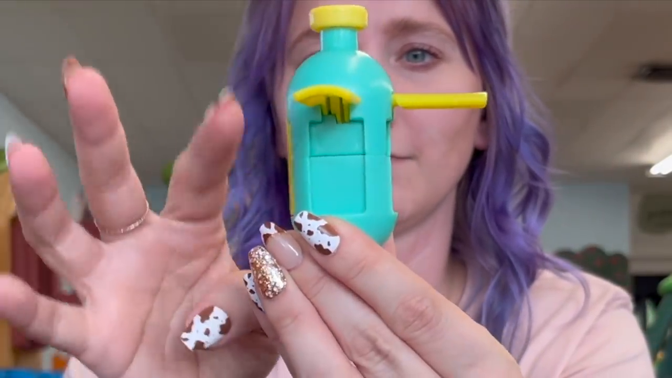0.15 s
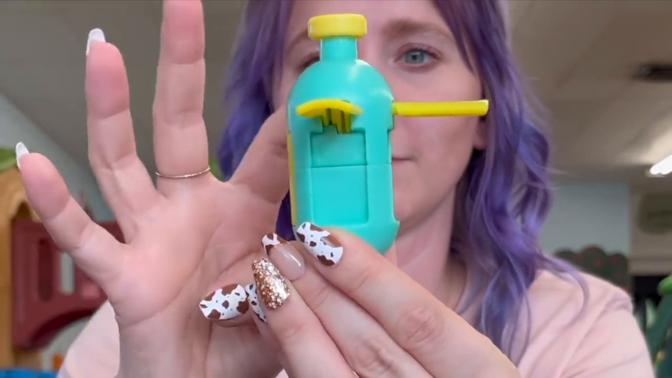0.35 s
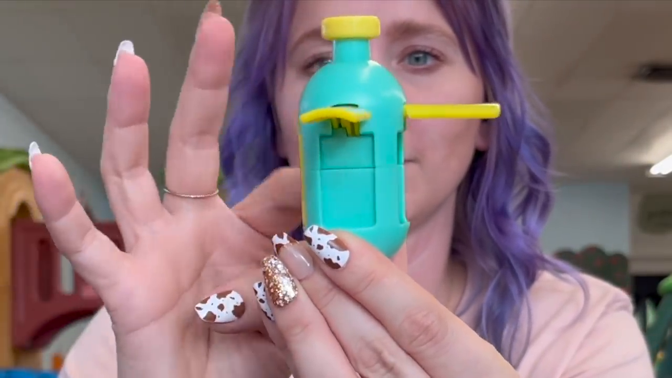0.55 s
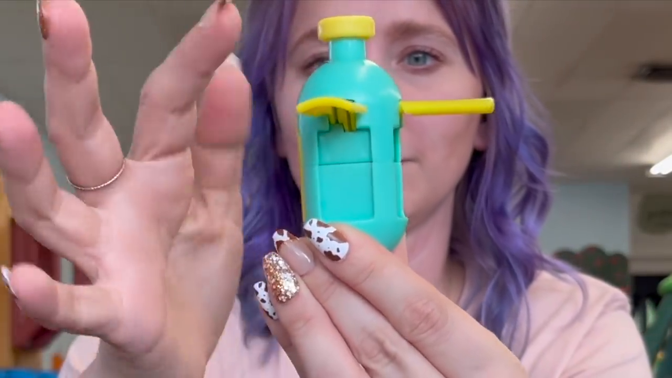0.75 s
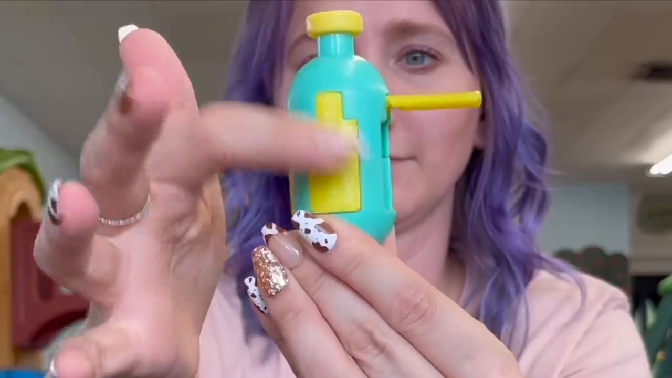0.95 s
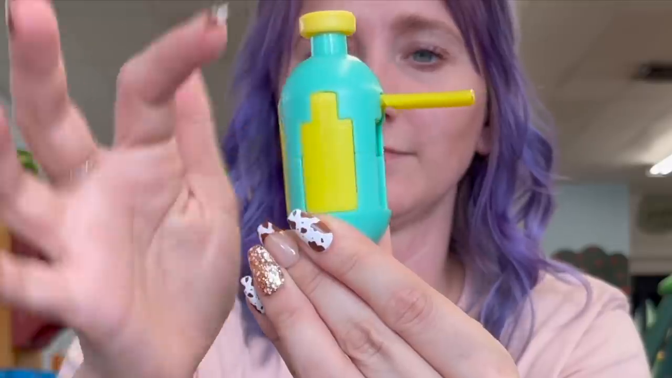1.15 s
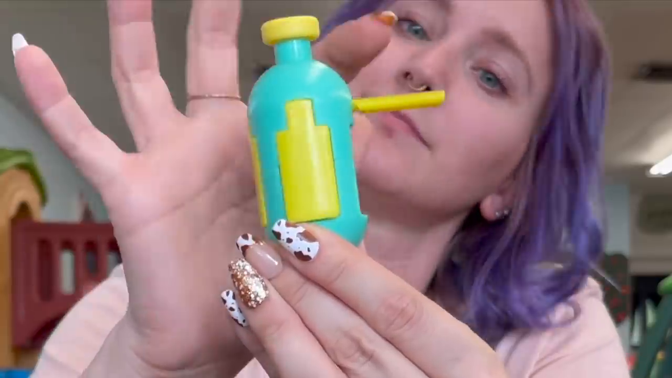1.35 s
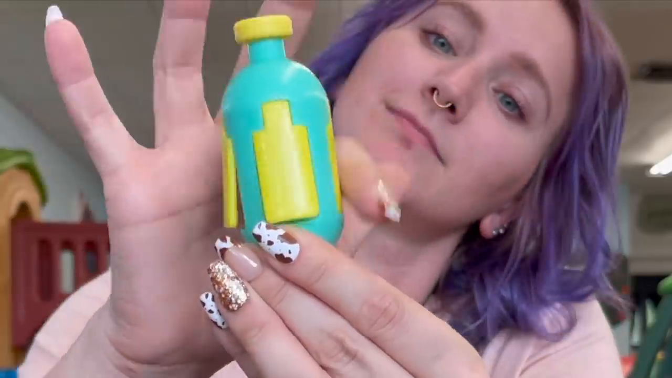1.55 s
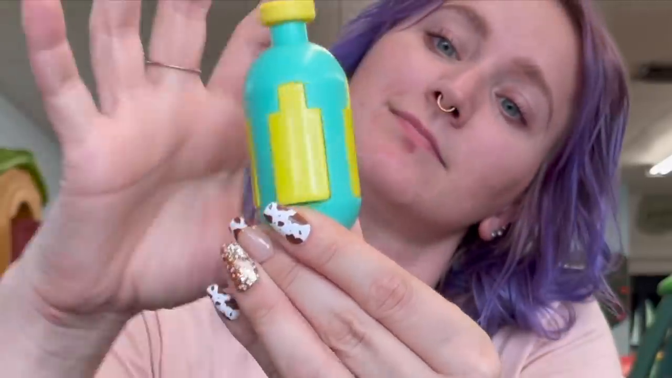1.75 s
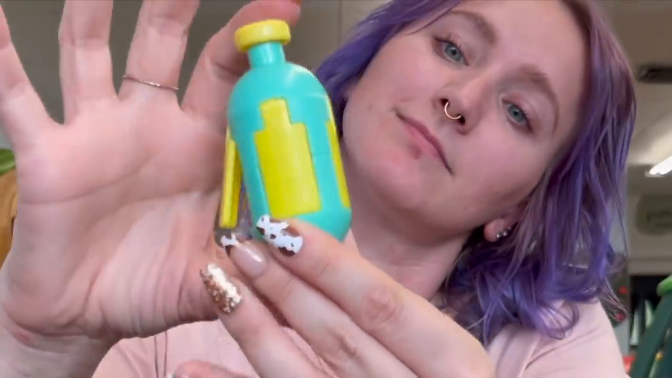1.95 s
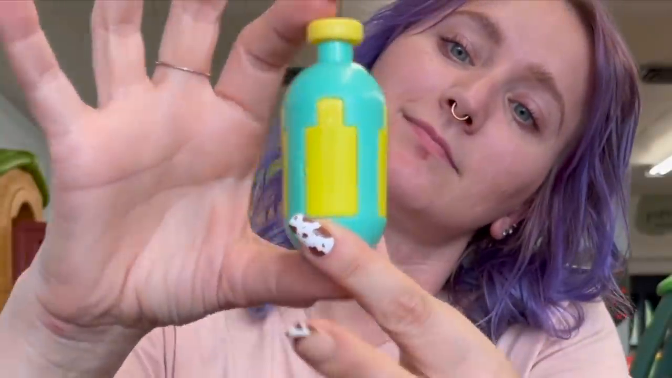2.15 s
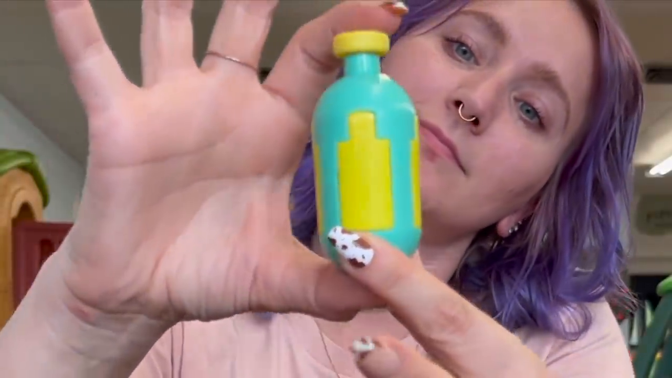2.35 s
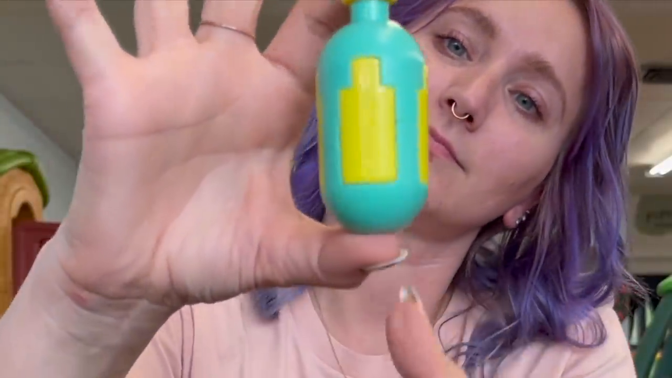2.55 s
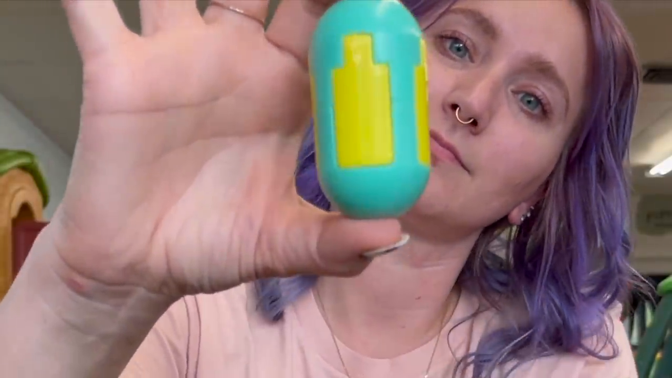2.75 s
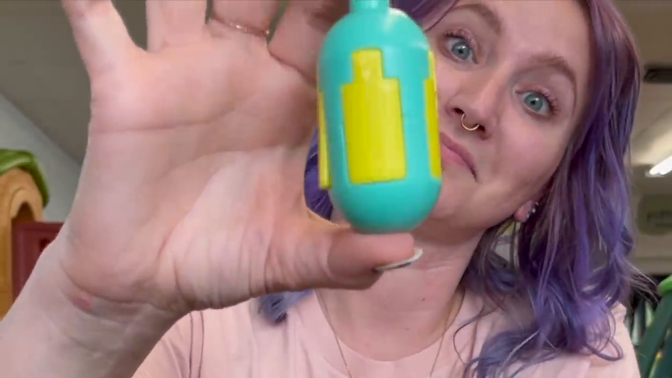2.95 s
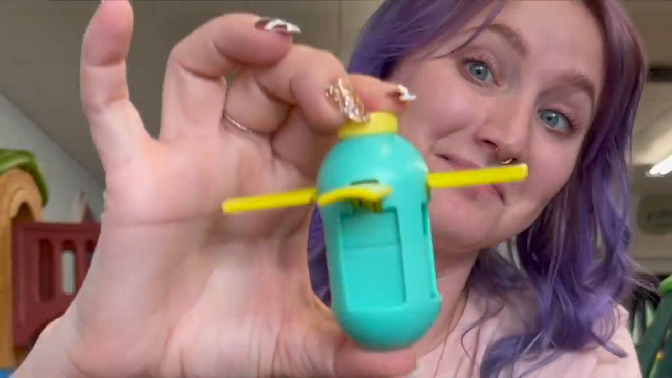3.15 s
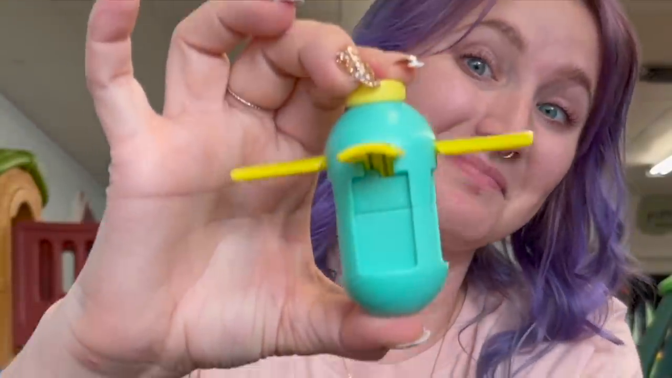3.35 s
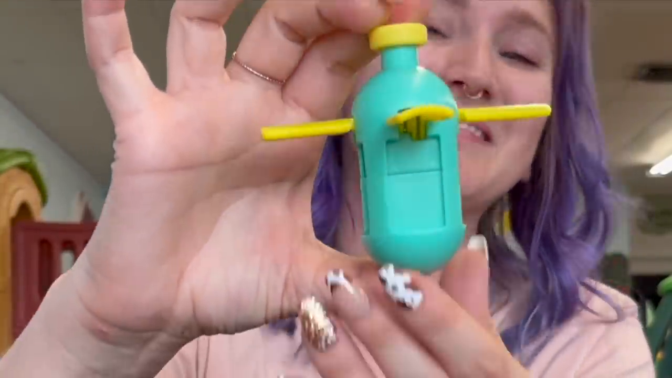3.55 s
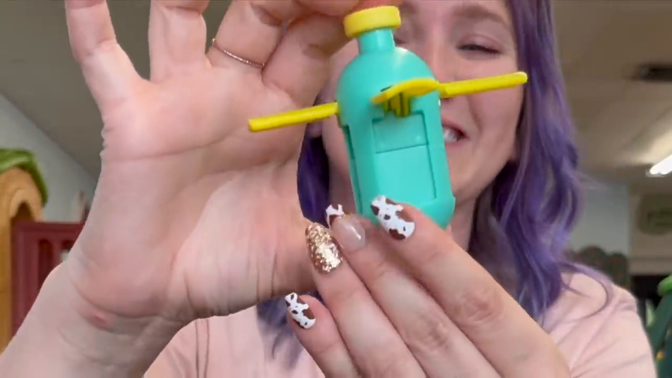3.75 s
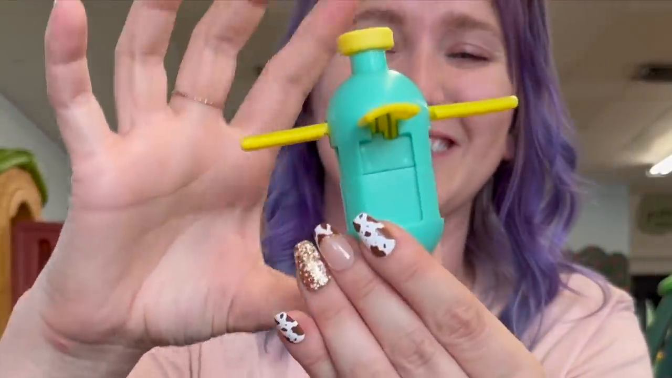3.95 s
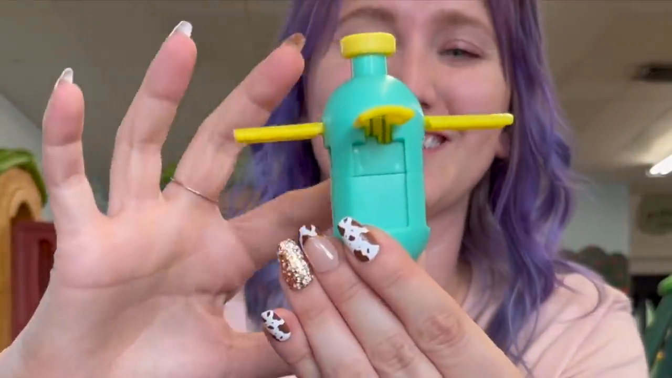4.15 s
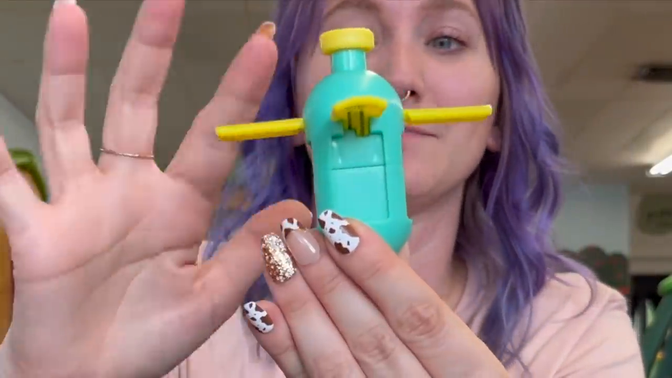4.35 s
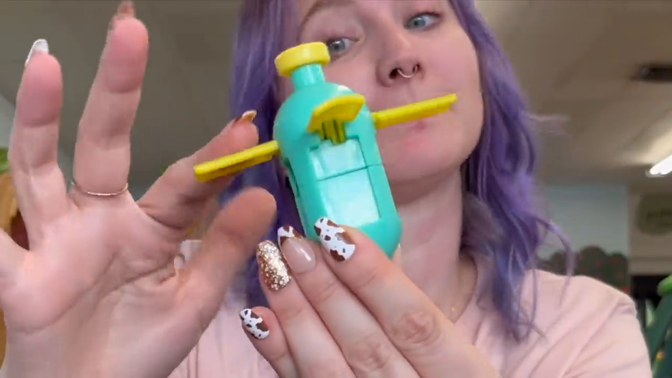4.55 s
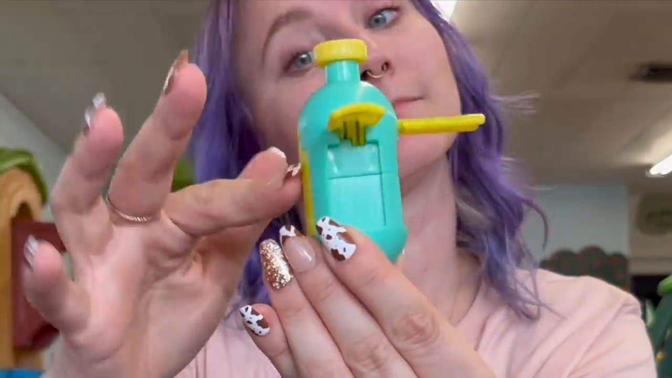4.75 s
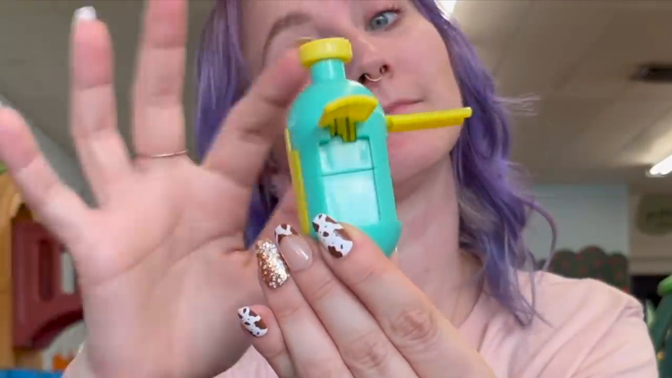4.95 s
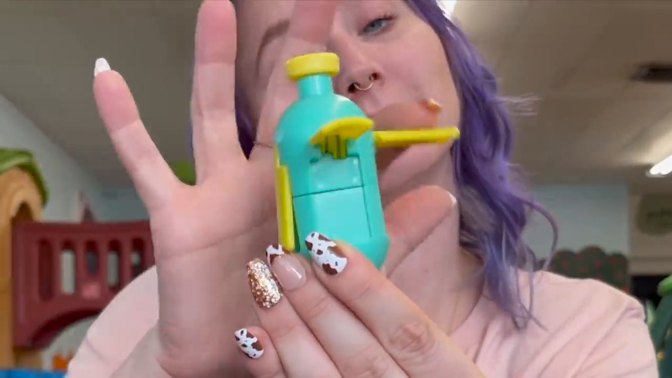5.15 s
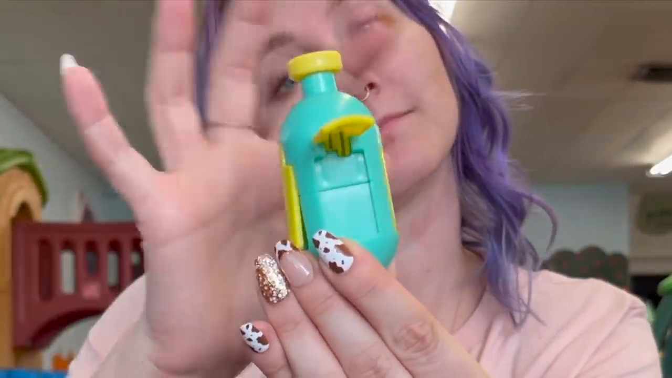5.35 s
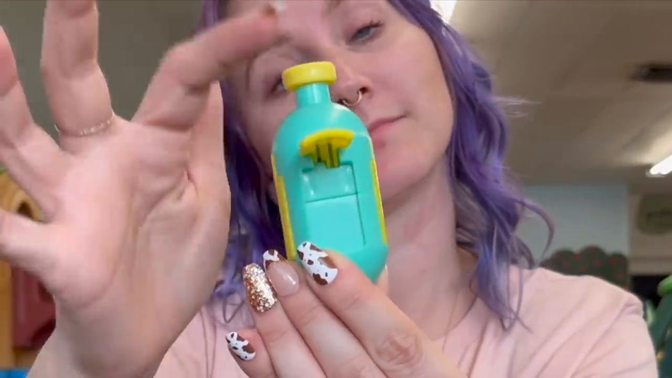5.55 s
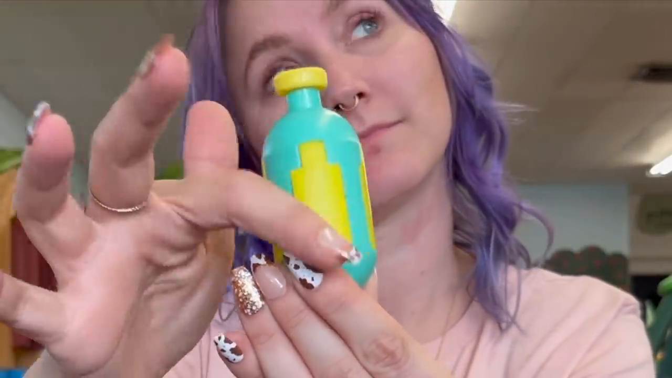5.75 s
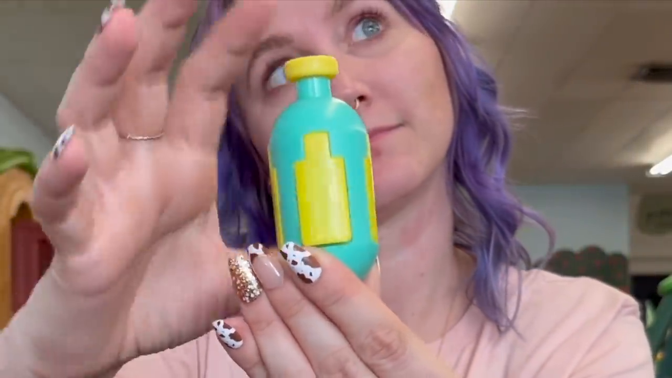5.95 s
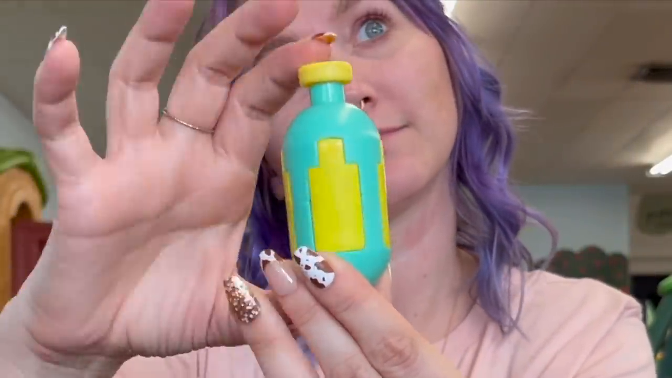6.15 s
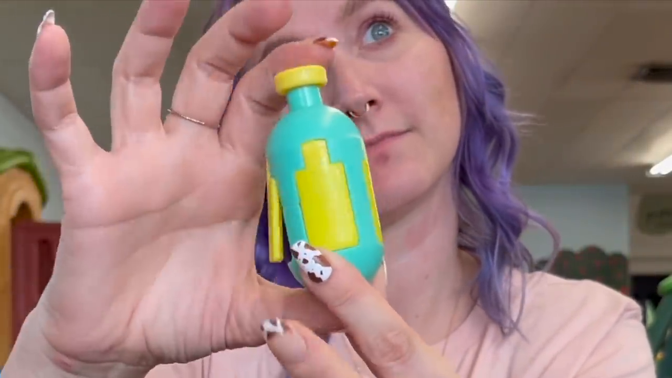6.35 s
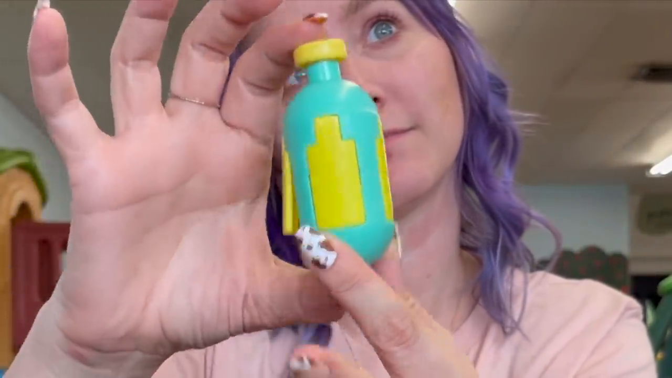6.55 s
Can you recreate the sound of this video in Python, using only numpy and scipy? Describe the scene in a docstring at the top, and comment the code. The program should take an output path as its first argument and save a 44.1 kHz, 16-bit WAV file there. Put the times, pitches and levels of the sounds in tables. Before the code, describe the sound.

A small hollow plastic fidget toy is worked by hand close to the microphone. Its sprung flaps flick open and latch shut with sharp, bright snaps at an uneven pace, a quick cluster coming about halfway through. Between the snaps, fingernails tick on the shell and fingers rub and bump it softly. The room adds a short echo, and ventilation rumbles and hums faintly behind.

```python
"""In a fairly live room, a small hollow plastic fidget toy is worked by hand close to the microphone.
Its sprung flaps fly open and latch shut: each impact sets the shell vibrating with a sharp snap.
Between snaps fingernails tick, fingers slide by stick-slip friction and soft fingertips knock dully.
The room reverberates, and ventilation rumbles and hums faintly behind."""
import sys
import numpy as np
from scipy import signal
from scipy.fft import rfft, irfft
from scipy.io import wavfile

SR = 44100
rng = np.random.default_rng(int(sys.argv[2]) if len(sys.argv) > 2 else 0)


def master(y):
    """Save y as 16-bit WAV."""
    cut = np.clip(np.atleast_2d(y).T, -1, 1)
    pcm = np.round(cut * 32767)  # scale
    wavfile.write(sys.argv[1], SR, pcm.astype(np.int16))


N = 291501


def from_db(db):
    """Amplitude ratio of a level in decibels."""
    return 10 ** (np.asarray(db) / 20)


def unit_rms(x):
    """Normalisation to rms 1."""
    return x / np.sqrt(np.mean(x ** 2) + 1e-30)


def unit_energy(x):
    """Normalisation of each row to energy 1."""
    return x / np.sqrt(np.sum(x ** 2, axis=-1, keepdims=True) + 1e-30)


def at_hz(curve, hz):
    """Interpolation of (frequency, value) pairs on a log-frequency axis."""
    knots_hz, values = np.transpose(curve)
    return np.interp(np.log(hz + 1e-9), np.log(knots_hz), values)


def add(track, onset_s, sound):
    """Superposition: a sound adds to the track from its onset."""
    start = int(np.clip(round(onset_s * SR), 0, N))
    track[start:start + len(sound)] += sound[:N - start]


# left-right coherence of the diffuse field: f/Hz, coherence (0-1)
COHERENCE = [(70, 0.96), (130, 1), (300, 0.5), (1200, 0.2), (2500, 1), (6500, 0), (8000, 1), (15000, .95)]

def diffuse_field(size):
    """Partial coherence: noise from all sides is only partly alike left and right. Gives f and spectra."""
    hz = np.fft.rfftfreq(size, 1 / SR)
    alike = np.clip(at_hz(COHERENCE, hz), 0, 1)
    mid, side = rfft(rng.standard_normal((2, size)))
    return hz, np.sqrt((1 + alike) / 2) * mid + np.sqrt((1 - alike) / 2) * side * [[1], [-1]]


# spectrum of moving air: f/Hz, relative spectral level/dB
AIR_SPECTRUM = [(20, -21.5), (35, -23), (47, -0.5), (58, 4), (78, -1.5), (100, -7.5), (135, -12),
                (165, -19), (260, -25), (500, -32.5), (1000, -38.5), (2500, -54.5), (9500, -56),
                (16000, -72)]

def ventilation(air_db=-53.5, hum_hz=120.4, hum_db=-62.5, waver=0.075):
    """Broadband noise plus a tone: air rumbles under an unsteady hum at twice the mains frequency."""
    hz, noise = diffuse_field(N)
    air = unit_rms(irfft(noise * from_db(at_hz(AIR_SPECTRUM, hz)), N))
    drift = unit_rms(irfft(rfft(rng.standard_normal(N)) * np.exp(-hz / 2.2), N))
    hum = np.sqrt(2) * np.sin(2 * np.pi * hum_hz * np.arange(N) / SR) * (1 + waver * drift)
    return from_db(air_db) * air + from_db(hum_db) * hum


def minimum_phase(magnitude):
    """Causality: the spectrum of this magnitude that rings only after it is struck."""
    cepstrum = irfft(np.log(magnitude + 1e-12))
    half = cepstrum.shape[-1] // 2
    fold = np.r_[1, np.full(half - 1, 2), 1, np.zeros(half - 1)]
    return np.exp(rfft(cepstrum * fold))


# resonances colouring every click, including a bright 10 kHz peak, probably the microphone's:
# f/Hz, width/Hz, relative level/dB
CLICK_RESONANCES = [(421.4, 250, -24.5), (877, 210, -17), (1398, 560, -8.5), (1744, 390, -8),
                    (2130, 100, -8.5), (3700, 590, -13.5), (4676, 1700, -3.5), (5930, 610, -5.5),
                    (6430, 330, -11.5), (8250, 1800, -4.5), (9460, 640, -7), (10110, 920, 6),
                    (10930, 280, -7), (12200, 540, -11.5), (14810, 1200, -25)]
# borders between a click's three registers (hollow low part, crack, bright edge): f/Hz
REGISTER_BORDERS = [2600, 7500]

def contact_clicks(levels_db, rattle_ms, ripple, rise_ms, scatter_db, size=1024):
    """Source and filter: resonances colour a rattle of micro-impacts, one output row per contact.
    levels_db[register, contact] is rms over 6 ms."""
    ms = 1000 * np.arange(size) / SR
    hz = np.fft.rfftfreq(size, 1 / SR)
    force = (1 - np.exp(-(ms / rise_ms) ** 2)) * np.exp(-ms / rattle_ms[:, None])
    impacts = rfft(force * rng.standard_normal(force.shape))
    # the micro-impacts interfere and ripple the spectrum; ripple 0 evens it out
    evened = irfft(impacts / (np.abs(impacts) + 1e-12) ** (1 - ripple))
    rattle = rfft(evened * force ** 0.25)
    register_power = np.zeros((len(REGISTER_BORDERS) + 1,) + rattle.shape)
    for centre_hz, width_hz, level_db in CLICK_RESONANCES:
        # each contact lands elsewhere and favours other resonances
        strength = from_db(level_db + scatter_db * rng.standard_normal((len(force), 1)))
        detuning = (hz ** 2 - centre_hz ** 2) / (hz + 1) / width_hz
        register = np.searchsorted(REGISTER_BORDERS, centre_hz)
        register_power[register] += (strength / (1 + detuning ** 2 / 2)) ** 2
    energy = np.mean(register_power * np.abs(rattle) ** 2, axis=-1, keepdims=True)
    filter_power = np.sum(register_power / energy * from_db(levels_db)[:, :, None] ** 2, axis=0)
    return irfft(rattle * minimum_phase(np.sqrt(filter_power * 0.006 * SR)))


def ring(hz, t60, size=6000):
    """Damped free vibration: a sine that swells in about 1 ms, with the energy of 6 ms at rms 1."""
    t = np.arange(size) / SR
    swell = 1 - np.exp(-(t / 0.0007) ** 2)
    sine = np.sin(2 * np.pi * (hz * t + rng.random()))
    return unit_energy(sine * swell * from_db(-60 * t / t60)) * np.sqrt(0.006 * SR)


# flaps leaving and hitting their stops: t/s, relative crack level/dB, hollow level/dB re crack,
# edge level/dB re crack, rattle time/ms, main ring f/Hz, its level/dB re crack, second ring f/Hz
FLAP_IMPACTS = [(0.0114, -27, -8, 7.5, 0.51, 2140, -5, 5730),
                (0.0415, -31, -13.5, 7.5, 2.5, 2370, -22.5, 6950),
                (0.456, -30, -16.5, 9.5, 0.57, 2110, -23, 5400),
                (0.458, -33.5, -6.5, 5.5, 0.47, 2140, -8.5, 4570),
                (0.9479, -23.5, -7, 5.5, 1.5, 2094, -11.5, 5085),
                (0.973, -33, -16.5, 3, 0.65, 2173, -25, 5395),
                (1.4922, -19, -10, 5.5, 2.16, 1350, -10, 5633), (2.979, -41, -6, 6, 2.8, 1700, -10.5, 4200),
                (3.0025, -26, -14, 6, 2.8, 1250, -10, 3900), (3.0052, -23, -7, 8.5, 2.4, 2200, -19.5, 3074),
                (4.1285, -26.5, -9.5, 9.5, 1.83, 2185, -7, 4580),
                (4.2517, -42.5, -8.5, 8.5, 1, 2190, -3, 4400), (4.72, -24, -9, 8, 1.8, 2100, -10, 4620),
                (5.1963, -27.5, -6, 12, 1.45, 6660, 3.5, 5820),
                (5.3032, -46.5, -5, 13, 1.6, 1892, -16, 5380), (5.692, -60, -13, 19, 1.4, 1800, -21, 5270),
                (5.727, -30.5, -5.5, 0.5, 2.5, 1824, -8, 5580)]

def flap_snaps(ripple, main_t60=0.012, second_t60=0.0045, second_db=-6.5):
    """Impulse excitation: a flap slams home, the shell cracks, and flap and cavity ring briefly."""
    onsets, crack_db, hollow_db, edge_db, rattle_ms, main_hz, main_db, second_hz = (
        np.transpose(FLAP_IMPACTS))
    levels_db = np.array([crack_db + hollow_db, crack_db, crack_db + edge_db])
    cracks = contact_clicks(levels_db, rattle_ms, ripple, rise_ms=0.52, scatter_db=3.0)
    out = np.zeros(N)
    for k, crack in enumerate(cracks):
        add(out, onsets[k], crack)
        add(out, onsets[k], from_db(crack_db[k] + main_db[k]) * ring(main_hz[k], main_t60))
        add(out, onsets[k], from_db(crack_db[k] + second_db) * ring(second_hz[k], second_t60))
    return out


# bands of the reverberant tail, the top ones set to fade quickly: f/Hz, relative level/dB, T60/s
TAIL_BANDS = [(300, 3.5, 0.38), (690, -7, 0.47), (1410, -11.5, 0.82), (2180, -6, 0.39), (3100, -9.5, 0.6),
              (4600, -9, 0.55), (6460, -12.5, 0.52), (7950, -11.5, 0.41), (10400, -18, 0.39),
              (11945, -12.5, 0.22), (13500, -31, .09)]

def reverberation(source, early_db=-8.5, early_t60=0.1, build_s=0.0027, gap_s=0.002, top_hz=12800):
    """Multiple reflection: quick returns from hands and body, then a diffuse reverberant tail."""
    t = np.arange(SR) / SR
    hz, noise = diffuse_field(SR)
    noise = noise / np.sqrt(1 + (hz / top_hz) ** 20)   # low-pass filter
    early_noise = irfft(noise, SR)[:, ::-1]   # reversed, so uncorrelated with the tail
    response = from_db(early_db) * unit_energy(early_noise * (t > gap_s) * from_db(-60 * t / early_t60))
    build_up = 1 - np.exp(-np.maximum(t - gap_s, 0) / build_s)
    log_centres = np.log([row[0] for row in TAIL_BANDS])
    for share, (_, level_db, t60) in zip(np.eye(len(TAIL_BANDS)), TAIL_BANDS):
        band = irfft(noise * np.interp(np.log(hz + 1e-9), log_centres, share), SR)
        envelope = unit_energy(build_up * from_db(-60 * t / t60))
        response += from_db(level_db) * band * envelope
    return signal.fftconvolve(source[None], response, axes=1)[:, :N]


# taps of nails and loose flaps: t/s, relative peak level/dB, relative edge level/dB
NAIL_TAPS = [(0.1407, -39, -44.5), (0.5015, -33.5, -42), (0.8681, -38, -52), (1.418, -34.5, -43.5),
             (1.6359, -29.5, -42), (1.7125, -28, -42.5), (1.7639, -34, -62), (1.832, -51, -50),
             (1.8462, -36, -49.5), (2.0306, -36, -47), (2.1076, -39.5, -55.5), (2.2134, -31, -53),
             (2.2953, -43.5, -58), (2.3723, -39.5, -51), (2.452, -41, -63), (2.579, -42.5, -57.5),
             (2.7542, -60, -81), (2.8709, -63, -87), (2.9322, -49.5, -69.5), (3.4445, -33, -42),
             (3.4869, -48.5, -50), (3.7618, -60, -77), (4.4287, -40, -53), (4.4486, -44.5, -47.5),
             (4.924, -39.5, -50.5), (5.1503, -35, -51), (5.4216, -40.5, -46.5), (5.6343, -37.5, -50),
             (5.751, -30.5, -50), (5.9712, -40, -54), (6.004, -37.5, -55.5), (6.0397, -44, -57.5),
             (6.14, -47, -60.5), (6.194, -41, -62), (6.2264, -46.5, -64), (6.2589, -39.5, -67),
             (6.2953, -40, -64), (6.3382, -46, -50), (6.3616, -42.5, -46.5), (6.5074, -29.5, -43.5)]
# modes of the hollow body: f/Hz, level/dB re the tap's knock, T60/s
CAVITY_MODES = [(1370.6, -6, 0.028), (1786, -3.5, 0.063)]

def nail_ticks(ripple, crest_db=14.0, settle_s=0.019, settle_loss_db=15.5):
    """Cavity resonance: a light tap ticks on the shell and the hollow body answers with a short knock."""
    onsets, peak_db, edge_db = np.transpose(NAIL_TAPS)
    crack_db = peak_db - crest_db
    knock_db = -60.5 + 0.17 * (crack_db + 50)   # the knock grows more slowly than the crack
    levels_db = np.array([knock_db - 2.5, crack_db, edge_db])
    taps = contact_clicks(levels_db, rattle_ms=np.full(len(onsets), 2.0), ripple=ripple,
                          rise_ms=0.17, scatter_db=6.5)
    out = np.zeros(N)
    for k, tap in enumerate(taps):
        add(out, onsets[k], tap)
        # the nail settles with a second, weaker contact
        add(out, onsets[k] + settle_s * (0.5 + rng.random()), from_db(-settle_loss_db) * tap)
        for hz, level_db, t60 in CAVITY_MODES:
            detuned_hz = hz * (1 + 0.025 * rng.standard_normal())   # the grip shifts each mode
            add(out, onsets[k], from_db(knock_db[k] + level_db) * ring(detuned_hz, t60, size=2000))
    return out


# strokes of fingers and hinges on the shell: start t/s, end t/s, relative level/dB, slip rate/Hz
STROKES = [(0.43, 0.47, -53, 475), (0.86, 0.937, -60, 280), (0.934, 0.942, -46.5, 550),
           (1.419, 1.491, -58, 510), (1.793, 1.821, -54, 97), (2.073, 2.129, -53, 78),
           (2.189, 2.241, -45.5, 145), (2.251, 2.31, -60, 87), (2.385, 2.536, -63, 57),
           (2.962, 2.973, -48, 650), (2.979, 3.011, -41.5, 530), (3.427, 3.445, -65.5, 150),
           (3.447, 3.475, -54, 270), (3.77, 3.87, -82, 184), (4.073, 4.098, -64.5, 120),
           (4.101, 4.134, -54, 500), (4.434, 4.496, -60.5, 112), (4.697, 4.72, -51, 440),
           (5.133, 5.198, -53, 520), (5.625, 5.677, -53, 146), (5.705, 5.717, -49.5, 400),
           (6.202, 6.4, -58.5, 110), (6.472, 6.61, -55.5, 134)]

def finger_slides(gain_db=-11.0, spread_db=5.0, swell_db=1.5, max_slips=48):
    """Stick-slip friction: each stroke on the plastic is an uneven run of tiny contacts, a few ticking."""
    register_db = np.array([[-0.5], [0], [-1.5]])   # hollow, crack, edge
    out = np.zeros(N)
    for start, end, level_db, rate_hz in STROKES:
        jitter, size_draw = rng.random((max_slips, 2)).T
        onsets = start + (np.arange(max_slips) + jitter) / rate_hz
        unevenness_db = spread_db * (np.minimum(-np.log(size_draw), 3) - 1)
        progress = np.minimum((onsets - start) / (end - start), 1)
        slip_db = level_db + unevenness_db + swell_db * (progress - 0.5)   # the pressure builds
        slips = contact_clicks(slip_db + register_db, rattle_ms=np.full(max_slips, 1.5), ripple=1.0,
                               rise_ms=0.5, scatter_db=6.5, size=256)
        for onset, slip in zip(onsets[onsets < end], slips):
            add(out, onset, slip)
    return from_db(gain_db) * out


# fingertips landing on the body: t/s, relative level/dB, f/Hz
SOFT_IMPACTS = [(0.868, -59, 560), (1.108, -59, 527), (1.125, -66, 540), (1.845, -65, 592),
                (2.212, -65.5, 520), (5.148, -62.5, 521), (5.632, -55, 580), (6.293, -62, 600)]

def fingertip_bumps(t60=0.012, overtone_ratio=3.1, overtone_db=-3.5):
    """Compliant impact: a fingertip is too soft to excite the treble and gives only a dull, low knock."""
    out = np.zeros(N)
    for onset, level_db, hz in SOFT_IMPACTS:
        knock = ring(hz, t60) + from_db(overtone_db) * ring(hz * overtone_ratio, t60 / 2)
        add(out, onset, from_db(level_db) * knock)
    return out


def panned(x, balance):
    """Constant-power panning: left and right share the power at each frequency."""
    ratio = from_db(at_hz(balance, np.fft.rfftfreq(N, 1 / SR)))
    gains = np.array([ratio, np.ones_like(ratio)]) * np.sqrt(2 / (1 + ratio ** 2))
    return irfft(rfft(x) * gains, N)


# balance of the toy (nearer the left microphone port) and of the room: f/Hz, left minus right level/dB
TOY_BALANCE = [(400, 1.5), (950, 6), (1500, 1.5), (2200, 2), (3000, 8.5), (4600, 8.5), (6900, 8.5),
               (8000, -0.5), (10000, 1.5), (16000, -0.5)]
ROOM_BALANCE = [(1500, -1), (2200, -0.5), (3500, 3.5), (5000, 4), (7000, 4), (8500, 0)]

def scene(direct_db=0.36, snap_room_db=-1.5, touch_room_db=-3.0):
    """Superposition of the toy's direct sound, its reverberant field and the ventilation."""
    handling = finger_slides() + fingertip_bumps()
    direct = from_db(direct_db) * (flap_snaps(ripple=1.0) + nail_ticks(ripple=0.66) + handling)
    # the room gathers what the toy radiates in all directions, which evens out the ripple
    radiated = from_db(snap_room_db) * flap_snaps(ripple=0)
    radiated += from_db(touch_room_db) * (nail_ticks(ripple=0) + handling)
    return panned(direct, TOY_BALANCE) + panned(reverberation(radiated), ROOM_BALANCE) + ventilation()


# lead of the left microphone port over the right: f/Hz, phase/rad
PORT_LEAD = [(0, 0), (1500, .4), (3000, 1.0), (5000, .7), (6900, 0), (7500, .9), (8400, 0), (10200, -3.14),
             (11800, -6.28), (13600, -9.42), (15300, -12.57)]

def record(dry, ceiling=0.9, cutoff_hz=16300):
    """Phase difference between the two ports, soft saturation of the peaks, then low-pass filtering."""
    lead = np.interp(np.fft.rfftfreq(N, 1 / SR), *np.transpose(PORT_LEAD))
    ports = irfft(rfft(dry) * np.exp(1j * lead * np.array([[0.5], [-0.5]])), N)
    rounded = ceiling * np.tanh(ports / ceiling)
    low_pass = signal.ellip(10, 0.1, 80, cutoff_hz, fs=SR, output="sos")
    return signal.sosfilt(low_pass, rounded)


dry = scene()
out = record(dry)
master(out)
```